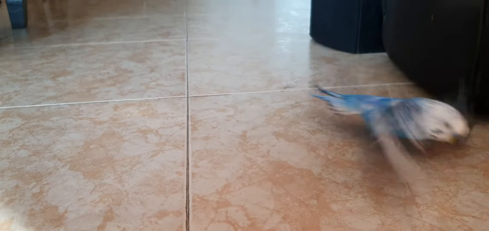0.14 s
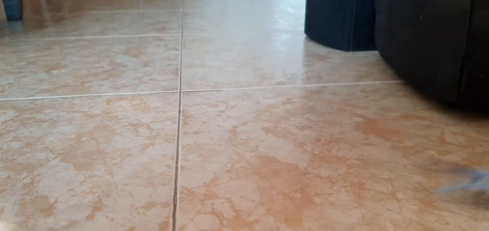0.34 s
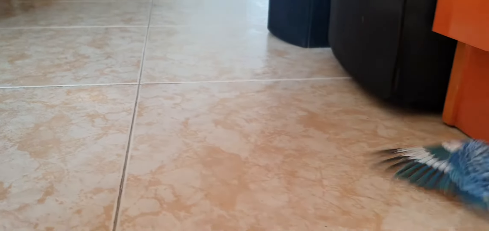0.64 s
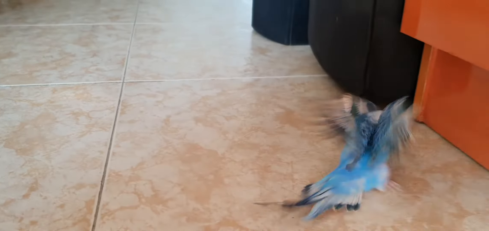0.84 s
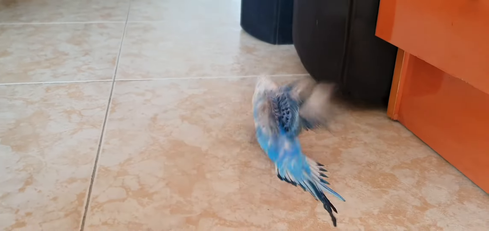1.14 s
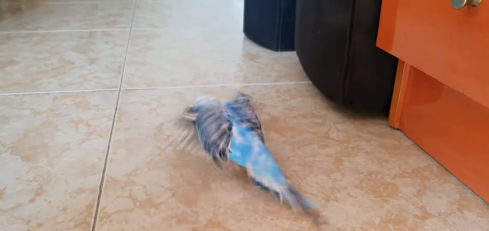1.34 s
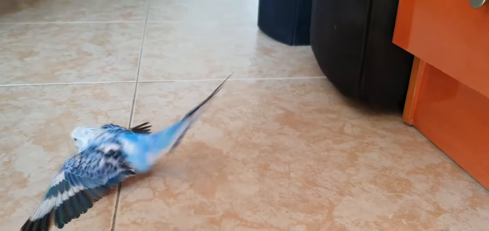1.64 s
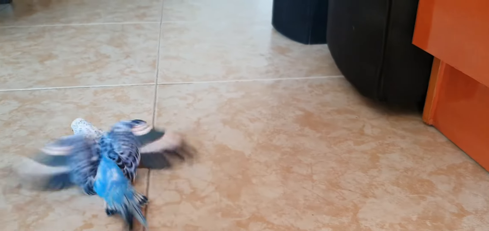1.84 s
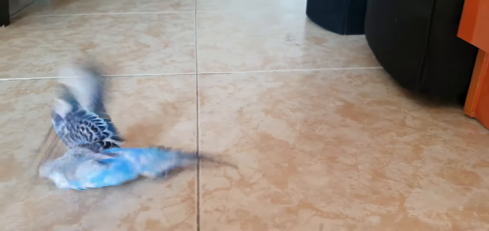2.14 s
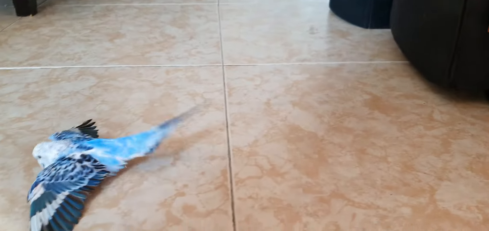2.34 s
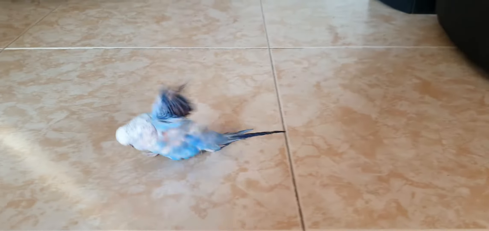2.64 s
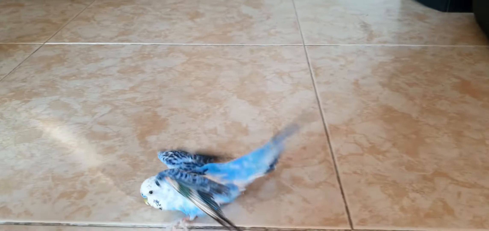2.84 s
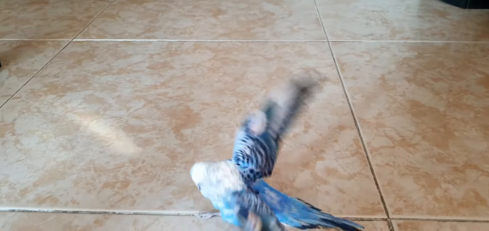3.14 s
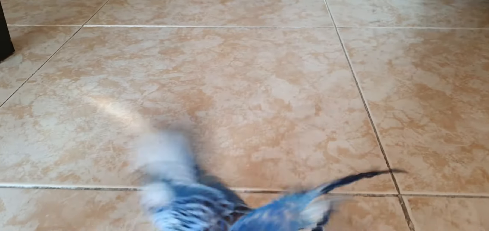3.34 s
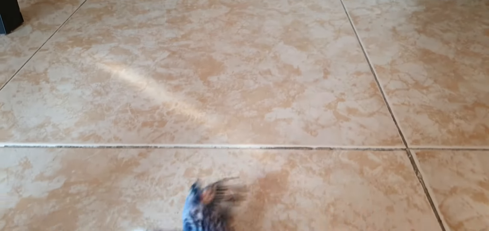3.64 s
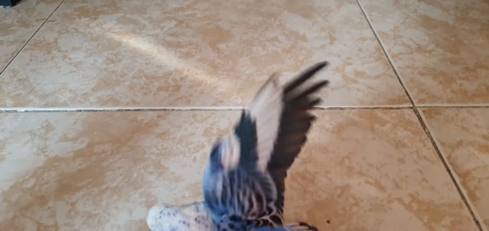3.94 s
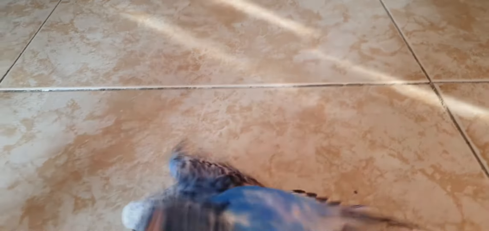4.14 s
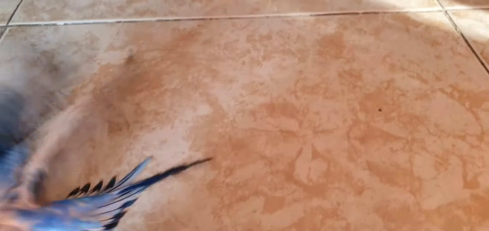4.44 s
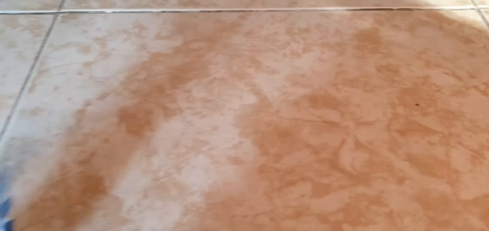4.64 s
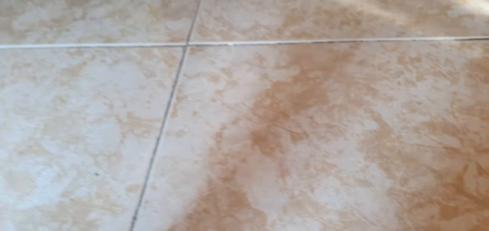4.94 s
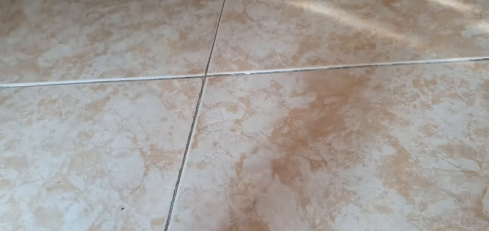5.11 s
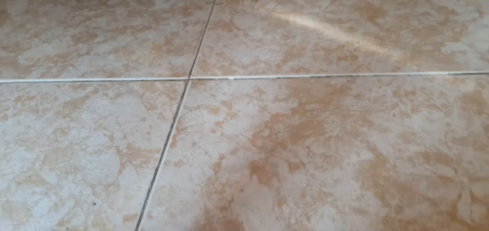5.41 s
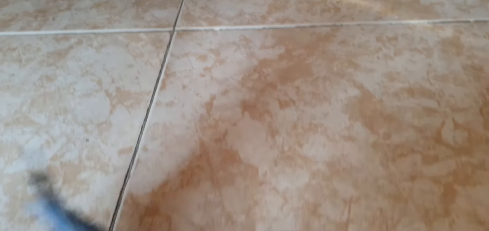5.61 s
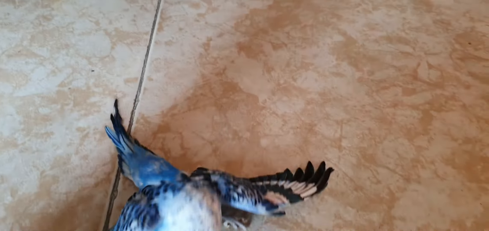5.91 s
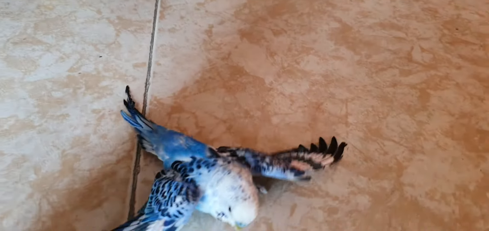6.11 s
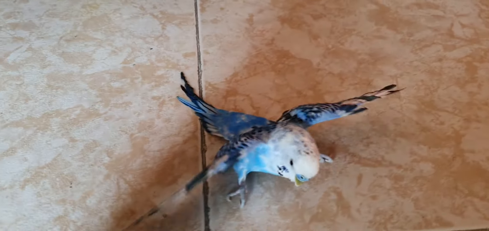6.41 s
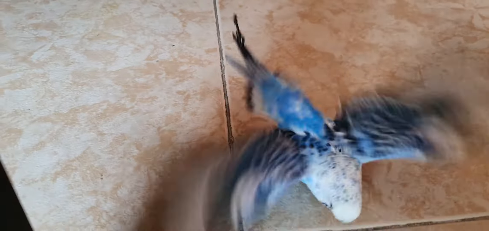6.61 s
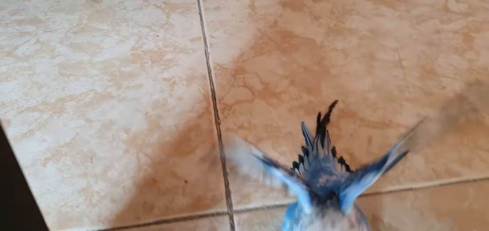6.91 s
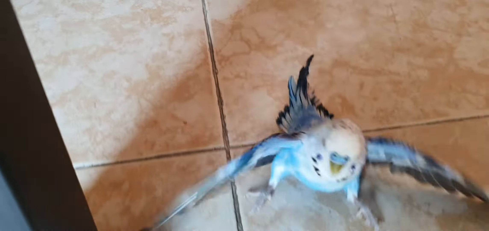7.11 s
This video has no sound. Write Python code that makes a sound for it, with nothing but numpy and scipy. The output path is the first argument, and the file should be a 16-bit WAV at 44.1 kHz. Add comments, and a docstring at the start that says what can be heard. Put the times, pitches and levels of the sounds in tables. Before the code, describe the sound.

A small bird flaps in quick flurries on a hard tiled floor, feathers slapping and hissing, then bumps the microphone with hollow knocks.

```python
"""Quick wing flaps, slaps and hissing feathers: a budgie skids over tiles in a small hard room, near a microphone.
Wing feathers slap and brush the tiles (short noise bursts), and each downstroke pushes a puff of air (a low swing).
Claws tick, plumage hisses as it slides, and light taps, snaps and clacks ring for a moment.
As the bird passes underneath, the microphone housing is rubbed and bumped: dull hollow knocks from damped
modes, then a short squeak of friction made of noise in a moving resonance."""
import sys
import numpy as np
from scipy import signal
from scipy.fft import rfft, irfft, next_fast_len
from scipy.io import wavfile

SR = 44100
rng = np.random.default_rng(int(sys.argv[2]) if len(sys.argv) > 2 else 0)


def pcm_store(signal):
    """Save signal as 16-bit PCM."""
    levels = np.round(np.clip(np.atleast_2d(signal), -1, 1) * 32767)
    wavfile.write(sys.argv[1], SR, levels.astype(np.int16).T)


N = 320166
TIME = np.arange(N) / SR

# Hard slaps of a wing on the tiles and, from 5.53 to 5.71 s, on the microphone housing; touch levels are
# relative, treble and body shape the tone: # start_s [s], level_db [dB], treble_db [dB], body_db [dB], puff_db
# [dB, the puff of air]
WING_SLAPS = [(0.0623, -18, -3, -9.5, -24), (0.1273, -14.5, 6.5, -1, -22), (0.1324, -19, -46, -17, -31.5),
              (0.191, -15, -2, -7, -31), (0.2092, -25, -17, -7, -43), (0.2798, -29.5, -7, -9, -58),
              (0.646, -21.5, -5.5, -5, -52), (0.7136, -13, -7.5, -11.5, -24.5),
              (0.7786, -17.5, -5.5, -1.5, -25.5), (1.3758, -25, -9, -11, -34.5),
              (1.4554, -36.5, -24, -12, -33.5), (1.519, -27, -7, -13.5, -53),
              (2.146, -24.5, -5.5, -11, -47), (2.669, -32.5, -13.5, -12, -40.5),
              (3.347, -23.5, -10, -16, -41), (4.2384, -27.5, -10, -7, -26.5),
              (4.5159, -24.5, -11, -22, -28.5), (5.3173, -26.5, -10, -18, -51),
              (5.5335, -16.5, -25.5, 0.5, -25.5), (5.592, -23, -36, -11, -35),
              (5.6493, -27, -24, -7.5, -40), (5.7137, -18, -26, -2, -47)]
# Runs of evenly spaced wingbeats; the levels are those halfway through a run:
# first_s [s], last_s [s], beats_per_s [about, 1/s], touch_db [dB, on the tiles], body_db [dB],
# puff_db [dB, puff of air], swell_db [dB gained from first to last beat], rustle_db [dB, relative]
WING_FLURRIES = [(0.004, 0.207, 15, -47, 2, -33.5, -13.5, -49),
                 (0.3, 0.418, 14, -46.5, -38, -43.5, -10.5, -63.5),
                 (0.497, 0.585, 14, -64, -26, -47, -12.5, -65), (0.65, 0.927, 14, -41, -5, -35, -6, -59),
                 (1.01, 1.449, 13.6, -48.5, 0, -36.5, -9, -56.5),
                 (1.622, 2.053, 11.6, -52, -22, -49.5, -2.5, -57),
                 (2.667, 2.762, 11, -45.5, -25, -47, 12, -58),
                 (3.242, 3.31, 13, -48.5, -14, -44.5, 4.5, -63),
                 (3.578, 3.776, 10, -56.5, -15, -52, -14.5, -71),
                 (3.924, 4.022, 10, -48.5, -26, -52, 7.5, -62), (4.102, 4.17, 14, -38, -4, -31.5, 7, -60),
                 (4.302, 4.521, 14.3, -40.5, -26, -35.5, -6, -53),
                 (4.595, 4.6, 14, -39, -14, -45, -8.5, -64), (5.18, 5.303, 14, -37, -1.5, -46, 8, -53),
                 (6.687, 6.85, 12.5, -46, 1, -41, -10, -69)]


def from_db(db):
    """Turn decibels into a gain."""
    return 10 ** (np.asarray(db) / 20)


def rms_one(x):
    """Scale to an rms (average strength) of 1."""
    return x / np.sqrt(np.mean(x ** 2) + 1e-20)


def in_time(rows):
    """Join the points of each column by straight lines in time."""
    s, *columns = np.transpose(rows)
    return [np.interp(TIME, s, column) for column in columns]


def at_hz(points, hz):
    """Read a curve over frequency, with straight lines on a log-frequency axis."""
    known_hz, values = np.transpose(points)
    return np.interp(np.log(np.maximum(hz, 1)), np.log(known_hz), values)


def pan(left_right_db):
    """Gains of the left and right channels that differ by this many dB."""
    return from_db(np.array([[.5], [-.5]]) * left_right_db)


def add(track, s, sound):
    """Mix a sound into a track at time s."""
    start = max(round(s * SR), 0)
    track[..., start:start + sound.shape[-1]] += sound[..., :N - start]


def band_filter(order, low_hz, high_hz):
    """A band-pass filter between two frequencies."""
    return signal.butter(order, [low_hz, high_hz], "band", fs=SR, output="sos")


def colour(x, spectrum):
    """Filter to this spectrum without ringing ahead of time (minimum phase); white noise keeps its power."""
    size = next_fast_len(N + SR // 4, True) // 2 * 2
    hz = np.arange(size // 2 + 1) * SR / size
    gain = rms_one(from_db(at_hz(spectrum, hz)))
    # fold the cepstrum so that the filter's answer starts at time zero
    cepstrum = irfft(np.log(gain))
    cepstrum[1:size // 2] *= 2
    cepstrum[size // 2 + 1:] = 0
    return irfft(rfft(x, size) * np.exp(rfft(cepstrum)))[..., :N]


def noise(alike):
    """White stereo noise whose channels share this part of their power."""
    return np.sqrt(alike) * rng.standard_normal(N) + np.sqrt(1 - alike) * rng.standard_normal((2, N))


def flutter(per_s, depth_db):
    """A random gain of unit power that takes a new value this many times a second."""
    steps = rng.standard_normal(N // 4)
    return rms_one(from_db(depth_db * np.interp(TIME * per_s, np.arange(len(steps)), steps)))


def narrow_noise(hz, width_hz, alike):
    """Stereo noise of rms 1 in a narrow band whose centre may move: slow noise carried on a tone."""
    low_pass = signal.butter(2, width_hz / 2, fs=SR, output="sos")
    slow = signal.sosfilt(low_pass, noise(alike) + 1j * noise(alike))
    phase = 2 * np.pi * np.cumsum(hz * np.ones(N)) / SR
    return rms_one(np.real(slow * np.exp(1j * phase)))


def swells(rows):
    """Add up bell-shaped swells from rows (middle_s, level_db, half_length_s)."""
    return sum(from_db(db) * np.exp(-.5 * ((TIME - s) / half) ** 2) for s, db, half in rows)


def decay(s, db, t60):
    """A level that starts at once and falls by 60 dB in t60 seconds."""
    return from_db(db - 60 * np.maximum(TIME - s, 0) / t60) * (TIME > s)


def linger(power, t60):
    """Stored energy leaks away by 60 dB in t60 seconds."""
    keep = from_db(-120 / (t60 * SR))   # -120 because this gain acts on power, not amplitude
    return signal.lfilter([1 - keep], [1, -keep], power + 1e-18)


def lean_right(x):
    """The treble reaches the right channel more strongly than the left."""
    # Balance of the two channels: pitch_hz [Hz], left_right_db [dB]
    balance = [(100, -1.5), (500, 1.5), (1200, 0), (2400, -3), (5000, -6), (10000, -7.5), (15000, -1)]
    size = next_fast_len(N, True)
    hz = np.arange(size // 2 + 1) * SR / size
    return irfft(rfft(x, size) * pan(at_hz(balance, hz)), size)[..., :N]


def from_bearing(x):
    """The bird's direction sets the delay, level and brightness in which the two channels differ."""
    # The bird's direction: time_s [s], left_delay_s [s by which the left is later], left_right_db [dB]
    bearing = [(0, .0002, -0.5), (0.8, .00018, -4), (1.7, -.00018, -0.5), (2.2, -.00043, -3),
               (3.35, -.00038, -2), (3.8, -0.00036, -3), (4.35, -.00018, 0.5), (5.0, -0.0002, -3),
               (5.3, -.00022, 0.5), (5.6, .00025, -1.5), (6.3, -.0002, 1), (7.2, .0001, -5)]
    # Treble of the left channel, which can lie in shadow: time_s [s], treble_db [dB]
    shadow = [(0, -8), (0.8, -7), (1.5, -0.5), (3.4, -0.5), (4.3, 0.5), (7.26, -4)]
    shadow_hz = 3500
    lag_s, side_db = in_time(bearing)
    left = np.interp(np.arange(N) - np.round(lag_s * SR), np.arange(N), x[0])
    treble = signal.sosfilt(signal.butter(1, shadow_hz, "high", fs=SR, output="sos"), left)
    treble_gain = from_db(in_time(shadow)[0])
    return pan(side_db) * np.array([left + (treble_gain - 1) * treble, x[1]])


def ambience():
    """The steady background is noise with a fixed spectrum."""
    # Background spectrum: pitch_hz [Hz], level_db [dB, relative]
    ambience_colour = [(18, -43.5), (30, 11), (81, 4), (233, 10.5), (499, -51.5), (1070, -54.5),
                       (3220, -40.5), (6900, -6), (12300, -44), (16000, -67)]
    return from_db(-67.5) * colour(noise(alike=0.73), ambience_colour) * pan(-4.0)


def sliding(catches_per_s=45, catch_size=5):
    """Plumage dragged over the tiles hisses; now and then a barb or claw catches as a tiny click."""
    # Plumage sliding on the tiles: time_s [s], level_db [dB, relative]
    slide_rows = [(0.0, -57), (0.12, -49), (0.48, -68), (0.58, -76), (0.71, -85), (0.83, -78), (1.11, -59),
                  (1.27, -61.5), (2.08, -71.5), (2.2, -59), (2.38, -88), (2.73, -55), (2.81, -64),
                  (3.34, -60), (3.74, -73.5), (3.96, -72.5), (4.12, -52), (4.27, -51.5), (4.35, -51),
                  (4.42, -49), (4.57, -46.5), (4.7, -46), (4.8, -55), (4.93, -53.5), (5.17, -49.5),
                  (5.36, -62), (5.56, -51.5), (5.7, -43), (5.86, -50), (5.99, -56.5), (6.39, -62),
                  (7.26, -64.5)]
    # Spectrum of the hiss: pitch_hz [Hz], level_db [dB, relative]
    slide_colour = [(300, -6), (550, -3.5), (850, 1), (1300, 0.5), (2200, 1.5), (3400, 2), (4500, -1),
                    (7000, -4.5), (9000, -12.5), (12000, -14), (16000, -26)]
    slide_db, = in_time(slide_rows)
    catches = (rng.random(N) < catches_per_s / SR) * rng.standard_normal(N) * catch_size
    hiss = noise(alike=0.014) * flutter(per_s=210, depth_db=1.15) * flutter(per_s=32, depth_db=3.0)
    return from_db(slide_db + 2) * colour(hiss + catches, slide_colour)


def rumble(air):
    """Air stirred by the puffs lingers round the microphone; rubbing on the housing adds to this low noise."""
    # Rubbing on the housing while the bird is close: time_s [s], level_db [dB, relative]
    rubbing = [(4.0, -84), (4.05, -52.5), (4.24, -48), (5.04, -57.5), (5.19, -44), (5.35, -51), (5.57, -55),
               (5.72, -49.5), (6.43, -63.5), (6.87, -54.5), (7.16, -64.5), (7.26, -76)]
    # Spectra of the deep draught and of the hollow rubbing: pitch_hz [Hz], level_db [dB, relative]
    draught_colour = [(15, -46), (30, -20.5), (50, -1.5), (75, 4.5), (110, -9), (170, -8.5), (260, -17),
                      (500, -38.5), (1500, -68)]
    rub_colour = [(100, -12), (230, -11), (320, 2.5), (420, -7), (560, -8.5), (780, -15.5), (1200, -18),
                  (3000, -54.5)]
    wake_t60_s = 0.55
    wake_deep_db, wake_hollow_db = -1.5, -12
    rub_deep_db, rub_hollow_db = 4, -5.5
    wake = np.sqrt(linger(air[1] ** 2, wake_t60_s))
    rub = from_db(in_time(rubbing)[0]) * (TIME > rubbing[0][0])
    still_air = from_db(-61) * pan(-4.5) * flutter(per_s=6.2, depth_db=4.0)
    deep = still_air + np.hypot(from_db(wake_deep_db) * wake, from_db(rub_deep_db) * rub)
    hollow = np.hypot(from_db(wake_hollow_db) * wake, from_db(rub_hollow_db) * rub)
    draught = deep * colour(noise(alike=0.8), draught_colour) * pan(-2.0)
    return draught + hollow * colour(noise(alike=0.89) * flutter(per_s=60, depth_db=3.0), rub_colour)


def wingbeats(spread_db=2):
    """Every beat of every flurry, evenly timed, swelling or fading with uneven strength."""
    beats = []   # rows: start_s, touch_db, body_db, puff_db
    for first, last, per_s, touch_db, body_db, puff_db, swell_db, _ in WING_FLURRIES:
        for along in np.linspace(0, 1, round((last - first) * per_s) + 1):
            effort_db = swell_db * (along - .5) + spread_db * rng.standard_normal()
            start_s = first + along * (last - first)
            beats.append((start_s, touch_db + effort_db, body_db, puff_db + effort_db))
    return beats


def puffs(beats, swell_cycles=0.42, eddy_share=0.29):
    """Each downstroke sends a pressure swing of a cycle or two, ruffled by eddies (low noise)."""
    middle_hz, spread_octaves, slap_delay_s = 85.7, 0.057, 0.0024
    t, swings, strength = TIME[:SR // 8], np.zeros(N), np.zeros(N)
    eddies = rms_one(signal.sosfilt(band_filter(2, 60, 260), noise(alike=0.92)))
    strokes = [(s + slap_delay_s, db) for s, *_, db in WING_SLAPS]
    strokes += [(s, db) for s, *_, db in beats]
    for s, peak_db in strokes:
        hz = middle_hz * 2 ** (spread_octaves * rng.standard_normal())
        age = t * hz / swell_cycles
        swell = from_db(peak_db) * age * np.exp(1 - age)
        add(swings, s, swell * np.sin(2 * np.pi * hz * t))
        add(strength, s, swell)
    return (swings + eddy_share * strength * eddies) * pan(0.1)


def landings(beats):
    """Light touches, hard slaps and the other wing, which lands after each slap, softer and duller."""
    # a glancing touch builds up more slowly than a slap
    touch_rise_s, touch_t60_s, touch_treble_db = 0.0052, 0.074, -14.5
    slap_rise_s, slap_t60_s = 0.0014, 0.027
    other_delay_s, other_db, other_treble_db, other_body_db = 0.011, -17.5, -6.5, 4
    # rows: start_s, level_db, treble_db, body_db, rise_s, t60_s
    rows = [(s, db, touch_treble_db, body_db, touch_rise_s, touch_t60_s) for s, db, body_db, _ in beats]
    for s, db, treble_db, body_db, _ in WING_SLAPS:
        rows.append((s, db, treble_db, body_db, slap_rise_s, slap_t60_s))
        rows.append((s + other_delay_s, db + other_db, treble_db + other_treble_db,
                     body_db + other_body_db, touch_rise_s, touch_t60_s))
    return rows


def slaps(beats, usual_treble_db=-8, usual_body_db=-11):
    """The quills of a wing land one after another: a burst of noise that quickly dies away."""
    # Spectrum of the quills: pitch_hz [Hz], level_db [dB, relative]
    slap_colour = [(150, -3.5), (400, 3.5), (600, 9.5), (800, 2.5), (1000, 4), (1500, 2.5), (2200, 1.5),
                   (2900, 0.5), (3600, 8.5), (4600, 2.5), (7200, 4.5), (8500, 1), (10000, 3), (12500, 2),
                   (16000, -14.5)]
    # Where a crisp stroke gains and a soft one loses: pitch_hz [Hz], share [0 to 1]
    crispness = [(2500, 0), (6000, .4), (10000, 1.0)]
    # Where the sound grows when more of the wing's weight lands: pitch_hz [Hz], share [0 to 1]
    weight = [(600, 1.0), (1800, 0)]
    # every landing has peaks and dips of its own, about this far apart
    ripple_db, ripple_hz = 3, 420
    t, out = TIME[:2048], np.zeros((2, N))
    quills = noise(alike=0.27) * flutter(per_s=2000, depth_db=0.5)
    hz = np.fft.rfftfreq(len(t), 1 / SR)
    grid_hz = np.arange(64) * ripple_hz
    for k, (s, level_db, treble_db, body_db, rise_s, t60) in enumerate(landings(beats)):
        tone_db = at_hz(crispness, hz) * (treble_db - usual_treble_db)
        tone_db += at_hz(weight, hz) * (body_db - usual_body_db)
        tone_db += ripple_db * np.interp(hz, grid_hz, rng.standard_normal(len(grid_hz)))
        piece = quills[:, k * len(t):(k + 1) * len(t)]
        rattle = irfft(rfft(piece) * from_db(tone_db))
        shape = np.minimum(t / rise_s, 1) ** 2 * from_db(-60 * np.maximum(t - rise_s, 0) / t60)
        burst = rms_one(rattle * shape) * np.sqrt(np.mean(shape ** 2))
        add(out, s, from_db(level_db - 3) * burst)
    return colour(from_bearing(out), slap_colour)


def feather_tips(attack_s=0.033, release_s=0.13):
    """The fine tips of the feathers add an airy hiss through each flurry, fading after its last beat."""
    # Spectrum of the tips: pitch_hz [Hz], level_db [dB, relative]
    tip_colour = [(3000, -22), (7000, -16), (9500, -21), (12000, -15.5), (14000, -27), (16000, -32)]
    rustle = np.zeros(N)
    for first, last, *_, db in WING_FLURRIES:
        fade_in = np.clip((TIME - first) / attack_s, 0, 1)
        fade_out = np.exp(-np.maximum(TIME - last, 0) / release_s)
        rustle += from_db(db) * fade_in * fade_out
    return from_db(-2) * rustle * colour(noise(alike=.1) * flutter(per_s=87, depth_db=2.5), tip_colour)


def sweeps():
    """A glancing stroke swells and fades as the barbs rasp over the floor."""
    # Feathers and soft things sweeping past: middle_s [s], level_db [dB, relative], half_length_s [s]
    sweep_rows = [(0.005, -37.5, 0.0062), (0.123, -28, 0.0018), (0.305, -44, 0.013), (0.503, -39.5, 0.0051),
                  (0.527, -39, 0.0047), (0.538, -33, 0.0027), (0.551, -35, 0.0067), (0.642, -40, 0.0035),
                  (0.659, -44, 0.0029), (3.27, -50, 0.026), (4.249, -41, 0.016), (6.54, -49.5, 0.012),
                  (6.613, -41.5, 0.011), (6.692, -47.5, 0.021), (6.768, -43.5, 0.013), (6.846, -42.5, .012)]
    # Spectrum of the sweeps: pitch_hz [Hz], level_db [dB, relative]
    sweep_colour = [(250, 8.5), (700, 1), (1300, -7.5), (2500, 1.5), (4000, 1), (7000, -1), (10500, -0.5),
                    (13000, 1.5), (16000, -11)]
    barbs = noise(alike=0.31) * flutter(per_s=1600, depth_db=4.0)
    return from_db(-3) * swells(sweep_rows) * colour(barbs, sweep_colour)


def room(x, first_echo_s=0.0037, near_t60=0.31, near_share=0.96):
    """In each band energy lingers as diffuse noise: briefly among furniture, longer between the walls."""
    # Dying-away time between the walls: pitch_hz [Hz], t60_s [s]
    room_t60 = [(100, 4), (500, .5), (3000, 2.3), (8000, 2.5), (15000, 1.5)]
    # Strength of the room's answer: pitch_hz [Hz], level_db [dB, relative]
    room_colour = [(100, 8), (500, 1.5), (1500, 5.5), (3500, 2.5), (8000, -2), (15000, -2)]
    # How alike the answer is in the two channels: pitch_hz [Hz], likeness [0 to 1]
    room_likeness = [(150, 0.96), (350, 0.92), (700, 0.71), (1300, 0.035)]
    out = 0
    edges = np.geomspace(60, 17000, 13)
    late = np.interp(TIME - first_echo_s, TIME, x[1])
    # two sets of noise, which neighbouring bands use in turn
    shared, own = rng.standard_normal((2, N)), rng.standard_normal((2, 2, N))
    for k, (low, high) in enumerate(zip(edges, edges[1:])):
        hz = np.sqrt(low * high)
        band = band_filter(2, low, high)
        power = signal.sosfilt(band, late) ** 2
        near = near_share * linger(power, near_t60)
        far = (1 - near_share) * linger(power, at_hz(room_t60, hz))
        alike = at_hz(room_likeness, hz)
        mixed = np.sqrt(alike) * shared[k % 2] + np.sqrt(1 - alike) * own[k % 2]
        diffuse = rms_one(signal.sosfilt(band, mixed))
        out = out + from_db(at_hz(room_colour, hz)) * np.sqrt(near + far) * diffuse
    return out


def taps(spread=1.165):
    """A light blow rings briefly: a narrow band of noise that quickly dies away."""
    # Light taps: start_s [s], level_db [dB, relative], pitch_hz [Hz], t60_s [s]
    tap_rows = [(0.1269, -21, 1310, 0.031), (0.203, -24, 1000, 0.04), (1.665, -33, 960, 0.019),
                (4.06, -33.5, 800, 0.024), (4.15, -35, 453, 0.036), (4.226, -27, 770, 0.027),
                (4.305, -29, 780, 0.033), (4.532, -23, 450, .03), (5.535, -12, 1300, 0.021),
                (5.55, -24, 1140, .025), (6.609, -38.5, 1360, 0.041), (6.668, -32, 340, 0.062),
                (6.677, -39, 1000, 0.09), (6.7083, -20, 900, 0.027), (6.7098, -28, 1350, .022),
                (6.93, -51, 663, 0.58), (6.85, -34, 1170, 0.036)]
    t, out = TIME[:SR // 6], np.zeros((2, N))
    contact = noise(alike=0.4)
    for s, level_db, hz, t60 in tap_rows:
        band = band_filter(2, hz / spread, hz * spread)
        cluster = rms_one(signal.sosfilt(band, contact[:, round(s * SR):][:, :len(t)]))
        add(out, s, cluster * from_db(level_db - 5 - 60 * t / t60))
    return out


def snaps():
    """A stiff quill snaps against something hard: one clear, quickly damped tone."""
    # Snaps: start_s [s], level_db [dB, relative], pitch_hz [Hz], t60_s [s]
    snap_rows = [(0.127, -15.5, 3460, 0.019), (0.193, -14, 9100, 0.0027), (5.3176, -8.5, 3730, 0.0038),
                 (5.594, -18, 2900, 0.003)]
    t, out = TIME[:SR // 20], np.zeros((2, N))
    for s, level_db, hz, t60 in snap_rows:
        add(out, s, from_db(level_db - 60 * t / t60) * np.sin(2 * np.pi * hz * t))
    return out


def claws(t60=0.0087, spread=1.18):
    """A hard point on glaze gives a very short, bright tick."""
    # Claw ticks: start_s [s], peak_db [dB, ahead of the stereo balance], pitch_hz [Hz, where it is strongest]
    claw_rows = [(0.1335, -21, 9000), (0.5567, -21, 10000), (3.8227, -44.5, 6000), (3.969, -33, 5700),
                 (4.6628, -26, 6230), (4.859, -34.5, 5300), (4.962, -39, 5000), (5.19, -36, 6030),
                 (5.3178, -24, 6000), (5.46, -47, 5960)]
    t, out = TIME[:SR // 50], np.zeros((2, N))
    for s, peak_db, hz in claw_rows:
        band = band_filter(1, hz / spread, hz * spread)
        burst = from_db(-60 * t / t60) * rng.standard_normal((2, len(t)))
        tick = signal.sosfilt(np.vstack([band, band]), burst)   # filtered twice
        add(out, s, from_db(peak_db) * tick / np.abs(tick).max())
    return out * pan(-9)


def thumps(rise_cycles=0.41):
    """A wing beating close by gives one strong, low swing of pressure."""
    # Low thuds by the microphone: start_s [s], level_db [dB], pitch_hz [Hz], left_right_db [dB]
    thud_rows = [(0.198, -24.5, 65, -5), (0.722, -22, 65.6, -1), (0.93, -28.5, 85, -1),
                 (2.672, -34, 70, -3), (3.116, -47, 110, -20), (3.317, -34, 55, -4), (3.708, -43, 76, -19),
                 (3.787, -42.5, 84, -18), (3.921, -47, 75, -18), (4.027, -33.5, 85, -3),
                 (4.111, -26, 70, 1), (4.175, -22.5, 114, 2), (4.244, -24, 90, 4), (4.315, -25.5, 109, 0),
                 (4.353, -32, 52, 0), (4.384, -29, 64.7, 0), (4.428, -26, 60, 2), (4.463, -24.5, 83, 2),
                 (4.531, -25, 169, 2), (4.601, -33, 140, 0), (5.225, -22.5, 69.5, -1),
                 (5.25, -19.5, 69, -3), (5.279, -28, 70, -2), (6.606, -34.5, 95, -2), (6.738, -29, 110, -1),
                 (6.848, -29, 108, -3), (7.034, -43, 90, -14)]
    t, out = TIME[:SR // 10], np.zeros((2, N))
    for s, level_db, hz, side_db in thud_rows:
        age = t * hz / rise_cycles
        swing = age * np.exp((1 - age ** 2) / 2) * np.sin(2 * np.pi * hz * t)
        add(out, s, -from_db(level_db) * pan(side_db) * swing)   # the first swing is negative
    return out


def scrapes():
    """Quills scrape briefly on the tiles: short swells of rough noise."""
    # Scrapes: middle_s [s], level_db [dB, relative], half_length_s [s]
    scrape_rows = [(0.851, -40, 0.0027), (0.932, -50, 0.0016), (1.019, -45, 0.0017), (1.113, -45.5, 0.0034),
                   (1.163, -45, 0.0066), (1.238, -46, 0.0046), (1.317, -47, 0.0029), (1.473, -40, 0.0032),
                   (1.975, -49, 0.0048), (2.737, -54, .003), (2.77, -48, 0.015), (2.88, -54, 0.052),
                   (3.271, -48, .001), (3.323, -40, 0.0011), (4.18, -41, 0.0042), (4.246, -37, 0.0047),
                   (4.318, -39.5, 0.007), (4.387, -42, 0.0083), (4.459, -38, .004), (4.522, -37, .007),
                   (4.602, -47, 0.0024), (4.69, -44.5, .015), (4.73, -52, 0.012), (5.245, -42, .004),
                   (5.256, -40.5, .005)]
    # Spectrum of the scrapes: pitch_hz [Hz], level_db [dB, relative]
    scrape_colour = [(500, 2.5), (1200, -2), (2500, -1.5), (3800, 1.5), (6000, -5), (10000, -12.5),
                     (16000, -13)]
    return swells(scrape_rows) * colour(noise(alike=0.6) * flutter(per_s=810, depth_db=7.0), scrape_colour)


def rings(crack_t60_s=0.025):
    """A hard clack is a sharp crack whose tail dies away roughly, in a few broad resonances."""
    # Clacks on the tiles: start_s [s], crack_db [dB, relative], tail_db [dB, relative], tail_t60_s [s]
    clack_rows = [(2.1464, -29, -45, 0.21), (3.3475, -23, -39.5, 0.31)]
    # Spectra of the crack and of its tail: pitch_hz [Hz], level_db [dB, relative]
    crack_colour = [(150, 13), (380, 4), (600, 2.5), (1300, -2), (2200, 6.5), (3050, -14), (3600, -11),
                    (4500, 8), (5800, 5), (7200, 15.5), (9000, -14), (11300, -2), (16000, -19)]
    ring_colour = [(500, -12), (1600, 2), (2150, 13), (2500, -5), (2900, -23), (3300, -18), (3700, 5),
                   (4300, 5), (5000, 1), (6000, -16), (7200, 6), (9000, -4), (13000, -7), (16000, -18)]
    crack = sum(decay(s, db, crack_t60_s) for s, db, _, _ in clack_rows)
    tail = sum(decay(s, db, t60) for s, _, db, t60 in clack_rows)
    rough = noise(alike=0.28) * flutter(per_s=190, depth_db=2.0)
    return from_bearing(colour(crack * noise(alike=0.57), crack_colour) + colour(tail * rough, ring_colour))


def swishes():
    """A spread wing swishes past: long, smooth swells of noise."""
    # Swishes: middle_s [s], level_db [dB, relative], half_length_s [s]
    swish_rows = [(2.4, -63.5, 0.038), (2.56, -63, 0.13), (2.88, -58, 0.079), (3.1, -66, 0.21),
                  (6.2, -52, 0.045), (6.34, -48.5, 0.04), (6.44, -53.5, 0.051)]
    # Spectrum of the swishes: pitch_hz [Hz], level_db [dB, relative]
    swish_colour = [(450, -14), (850, -5.5), (1300, -6), (2000, -2), (3000, 1), (4800, -5), (7000, -6),
                    (8500, -12), (11000, -17), (15000, -30)]
    return swells(swish_rows) * colour(noise(alike=0.4) * flutter(per_s=77, depth_db=1.0), swish_colour)


def knocks(press_s=0.0013):
    """Soft blows ring the housing; the grip damps and tunes each one differently."""
    # Knocks: start_s [s], level_db [dB, relative], damping [1 is usual, more is deader],
    # hardness_db [dB added to the higher modes], pitch [share of the usual]
    knock_rows = [(4.772, -35, 0.53, 0, 0.99), (4.787, -33.5, 0.73, -3, 1.02), (4.845, -42, 0.35, 8.5, 1),
                  (4.96, -24.5, 0.51, 1.5, 0.98), (4.992, -26.5, 0.53, 1, 1), (5.071, -30.5, 0.75, -1, 1),
                  (5.168, -29.5, 0.83, -8, 0.98), (5.188, -27, 1, -1, 1.02), (5.308, -26, 0.64, -8, 1),
                  (5.5347, -4.5, 4.8, 4.5, 0.87), (5.542, -14, 1.8, -8, 0.64),
                  (5.5941, -5, 0.86, -7, 1.004), (5.6494, -5, 1.6, 2, 1.017), (5.7123, -12.5, 1.23, 3, 1)]
    # The housing's modes: pitch_hz [Hz at pitch 1], level_db [dB, relative], t60_s [s at damping 1]
    housing_modes = [(70.7, -24, 1), (212, -43, 0.078), (319, 0, 0.086), (380, -9, 0.077),
                     (506, -11.5, 0.064), (739, -21.5, 0.066), (900, -29, 0.04), (1340, -13, 0.023)]
    hard_from_hz = 350
    t, out = TIME[:SR // 2], np.zeros((2, N))
    hz, mode_db, t60 = np.transpose(housing_modes)[:, :, None]
    for s, level_db, damping, hard_db, pitch in knock_rows:
        strength_db = level_db - 2 + mode_db + hard_db * (hz > hard_from_hz)
        strength_db = strength_db + 1.0 * rng.standard_normal(hz.shape)   # no two blows are alike
        modes = from_db(strength_db - 60 * t * damping / t60) * np.sin(2 * np.pi * hz * pitch * t)
        add(out, s, np.minimum(t / press_s, 1) * modes.sum(axis=0))
    return from_bearing(signal.sosfilt(band_filter(2, 45, 1100), out))


def scuffs():
    """Scuffs set the housing humming: swells of noise around its low resonances."""
    # Scuffs: middle_s [s], level_db [dB, relative], half_length_s [s]
    scuff_rows = [(4.83, -49.5, 0.06), (5.04, -44.5, 0.034), (5.23, -42.5, 0.056), (5.36, -44, 0.045)]
    # Spectrum of the hum: pitch_hz [Hz], level_db [dB, relative]
    scuff_colour = [(150, -31), (250, -2.5), (300, 1), (350, 0), (420, -4), (520, -17), (620, -16),
                    (900, -21), (2000, -49)]
    return swells(scuff_rows) * colour(noise(alike=0.75), scuff_colour)


def drags():
    """Feathers dragged over the housing: swells of lightly fluttering noise."""
    # Drags: middle_s [s], level_db [dB, relative], half_length_s [s]
    drag_rows = [(4.968, -38.5, 0.0049), (5.55, -32, 0.016), (5.578, -30, 0.026), (5.73, -32, 0.014),
                 (6.78, -55, 0.062), (6.95, -62, 0.046), (7.05, -60.5, 0.04)]
    # Spectrum of the drags: pitch_hz [Hz], level_db [dB, relative]
    drag_colour = [(200, 6.5), (700, 16.5), (1000, 4), (1300, 5), (2200, 0.5), (3400, 1), (6000, -9),
                   (10000, -15), (16000, -35)]
    return swells(drag_rows) * colour(noise(alike=0.096) * flutter(per_s=580, depth_db=-1.0), drag_colour)


def groan(width_hz=112):
    """Slow stick-slip on the housing: noise in a narrow, rough resonance whose pitch bends."""
    # Groan: time_s [s], level_db [dB], pitch_hz [Hz, centre of the resonance]
    groan_rows = [(5.538, -40, 578), (5.555, -39, 762), (5.566, -35, 799), (5.578, -55, 750),
                  (5.594, -26.5, 685), (5.612, -37, 764), (5.63, -45, 736)]
    db, hz = in_time(groan_rows)
    stroke = from_db(db) * (TIME > groan_rows[0][0]) * (TIME < groan_rows[-1][0])
    return stroke * narrow_noise(hz, width_hz, alike=0.74)


def shuffles():
    """Soft, low shuffles: swells of dull noise."""
    # Shuffles: middle_s [s], level_db [dB, relative], half_length_s [s]
    shuffle_rows = [(5.835, -32.5, 0.015), (5.915, -35, 0.023), (5.98, -40, 0.042), (6.225, -38.5, 0.034),
                    (6.31, -42, 0.053), (6.70, -47, 0.048), (6.85, -67, 0.029)]
    # Spectrum of the shuffles: pitch_hz [Hz], level_db [dB, relative]
    shuffle_colour = [(60, -13), (120, 7.5), (190, -3), (280, -0.5), (400, -15), (600, -18.5), (1500, -58)]
    return swells(shuffle_rows) * colour(noise(alike=0.95), shuffle_colour)


def rasp(width_hz=720):
    """Rough stick-slip: fast, uneven noise in one broad resonance that dips and then rises, under a hiss."""
    # Rasp: time_s [s], level_db [dB, relative], pitch_hz [Hz, centre of the resonance]
    rasp_rows = [(6.225, -49, 2300), (6.257, -40.5, 2063), (6.27, -36.5, 2006), (6.284, -32, 2160),
                 (6.296, -35, 2440), (6.306, -42, 2530)]
    # Spectrum of the hiss: pitch_hz [Hz], level_db [dB, relative]
    rasp_colour = [(1500, -31), (2500, 6), (3300, 2), (4400, 0), (5700, -6), (7000, 0), (8300, -9),
                   (10000, -12.5), (16000, -22)]
    db, hz = in_time(rasp_rows)
    stroke = from_db(db - 1) * (TIME > rasp_rows[0][0]) * (TIME < rasp_rows[-1][0])
    hiss = from_db(-6) * colour(noise(alike=0.19), rasp_colour)
    return stroke * flutter(per_s=400, depth_db=2.0) * (narrow_noise(hz, width_hz, alike=0.25) + hiss)


def scene():
    """Bird, housing and room together; the rasp and the plumage are too close or too soft to stir the room."""
    beats = wingbeats()
    air = puffs(beats)
    brushes = from_bearing(taps() + snaps() + sweeps() + scrapes())
    contacts = claws() + lean_right(slaps(beats) + brushes + drags())
    friction = lean_right(from_bearing(sliding() + feather_tips() + rasp() + swishes()))
    housing = knocks() + groan()
    into_room = from_db(-11.5) * contacts + from_db(-11.0) * air + from_db(-14.5) * housing
    echoes = lean_right(room(into_room))
    bird = contacts + lean_right(rings()) + air + thumps() + friction + shuffles()
    return bird + housing + scuffs() + rumble(air) + echoes + ambience()


def record(dry):
    """A steep low-pass filter cuts the very top of the sound."""
    cutoff_hz = 16200
    return signal.sosfilt(signal.ellip(10, .2, 80, cutoff_hz, fs=SR, output="sos"), dry)


dry = scene()
out = record(dry)
pcm_store(out)
```